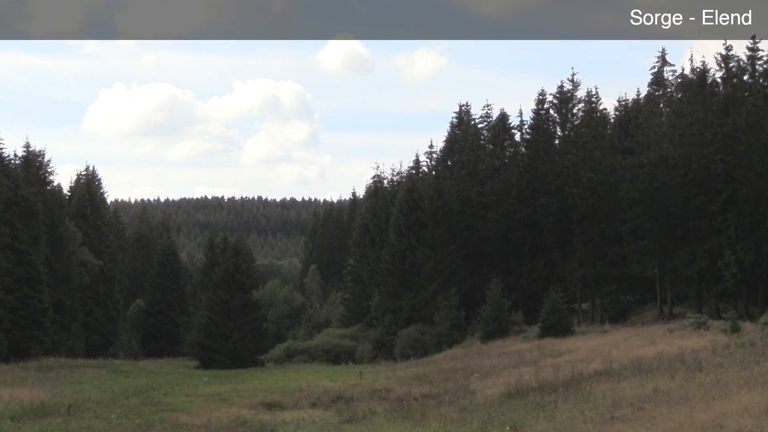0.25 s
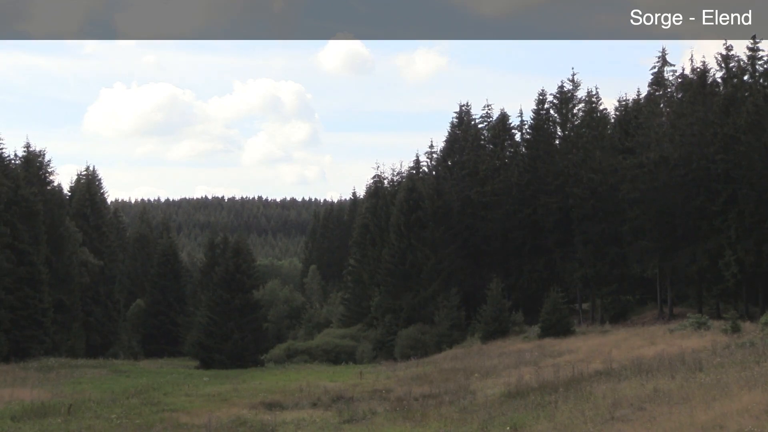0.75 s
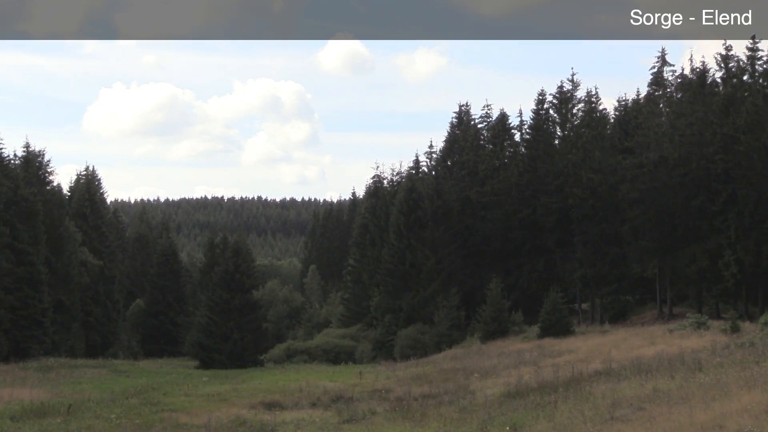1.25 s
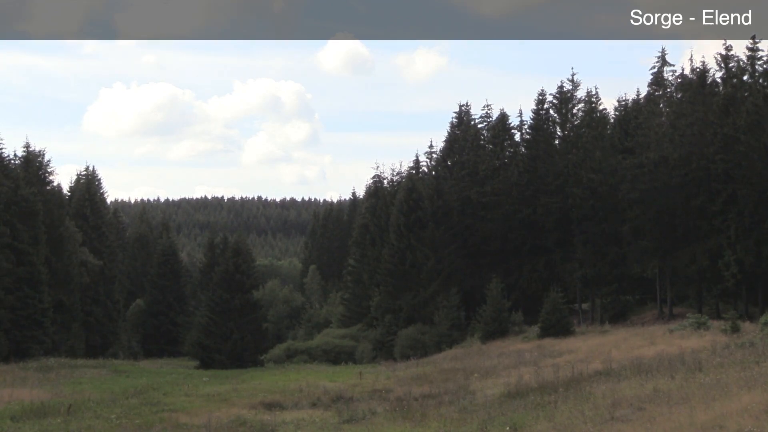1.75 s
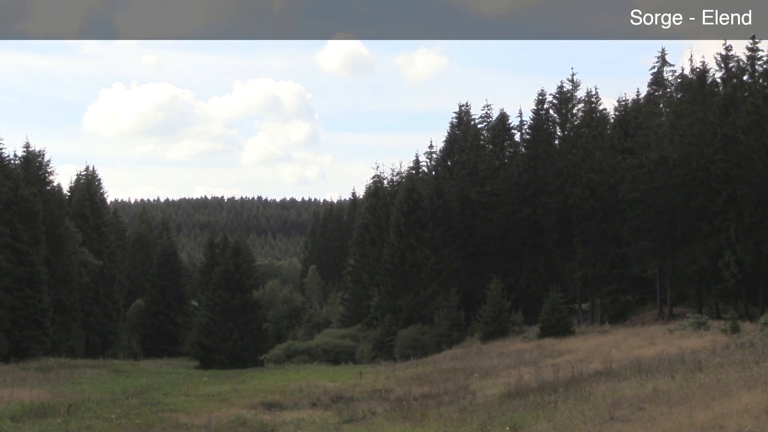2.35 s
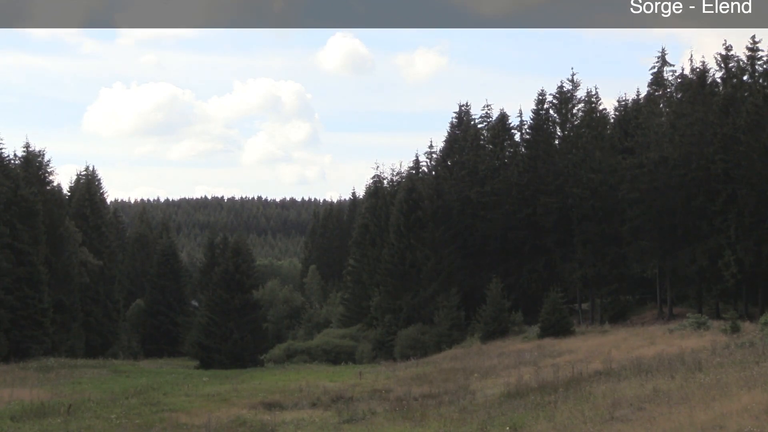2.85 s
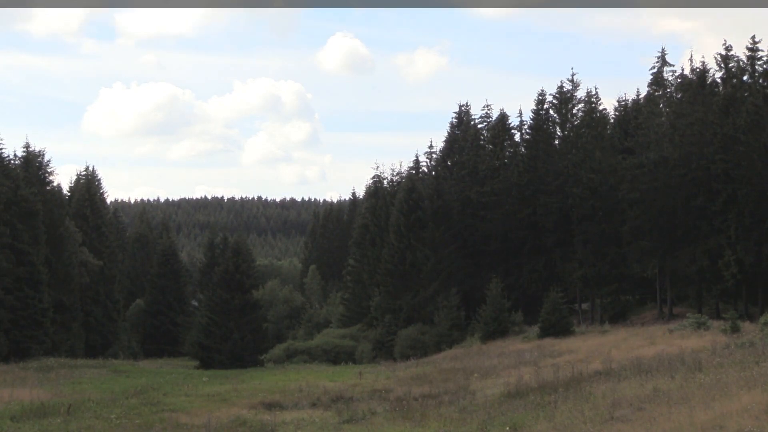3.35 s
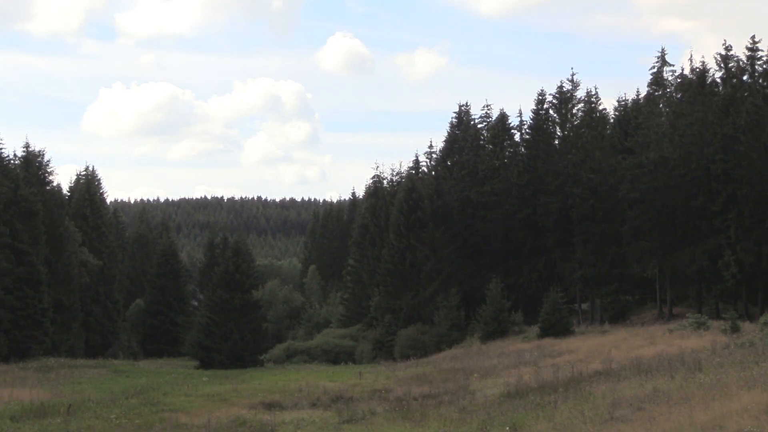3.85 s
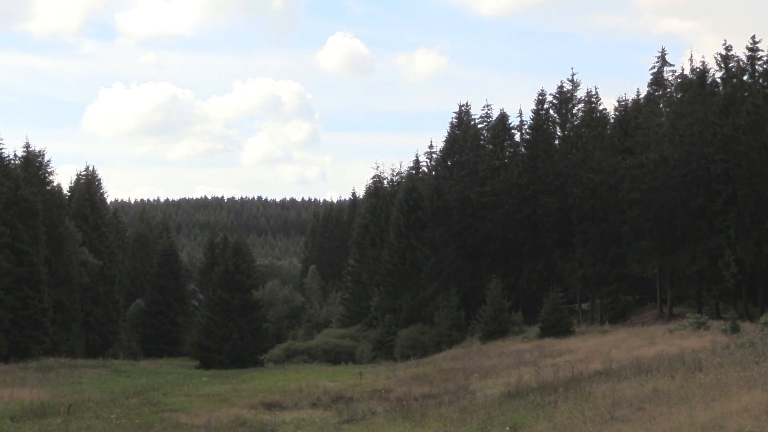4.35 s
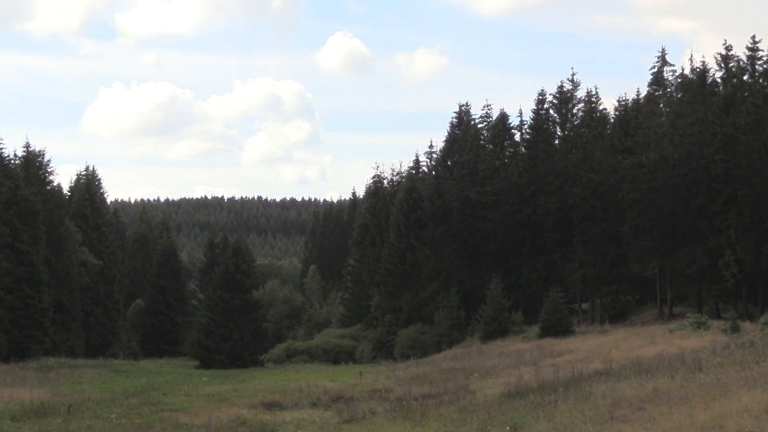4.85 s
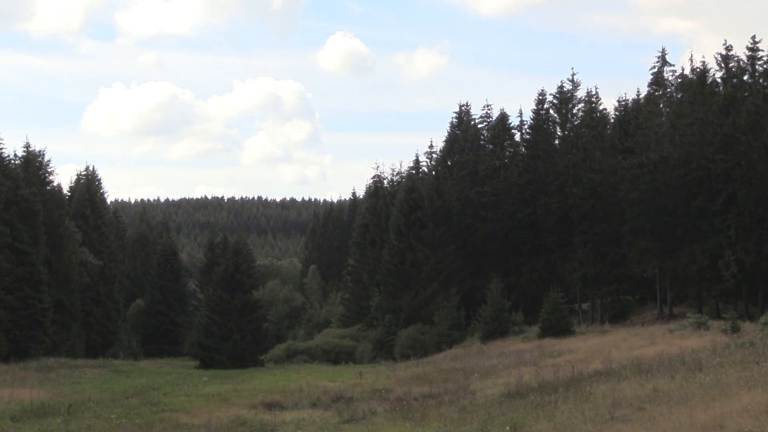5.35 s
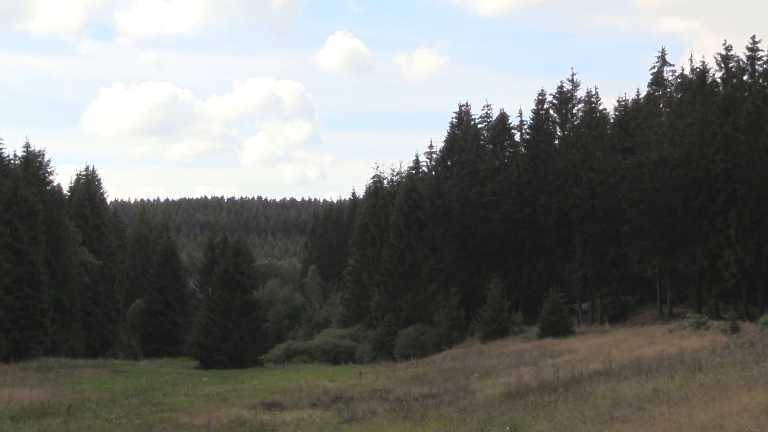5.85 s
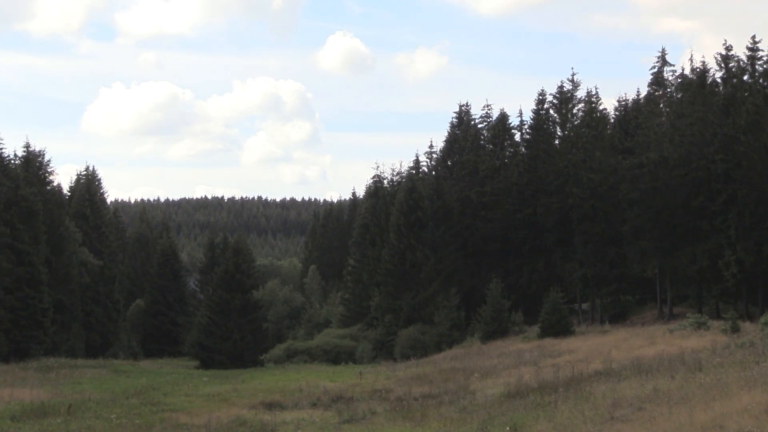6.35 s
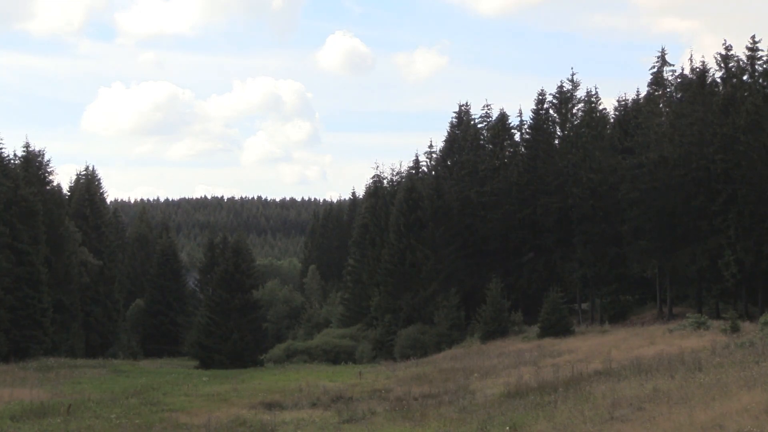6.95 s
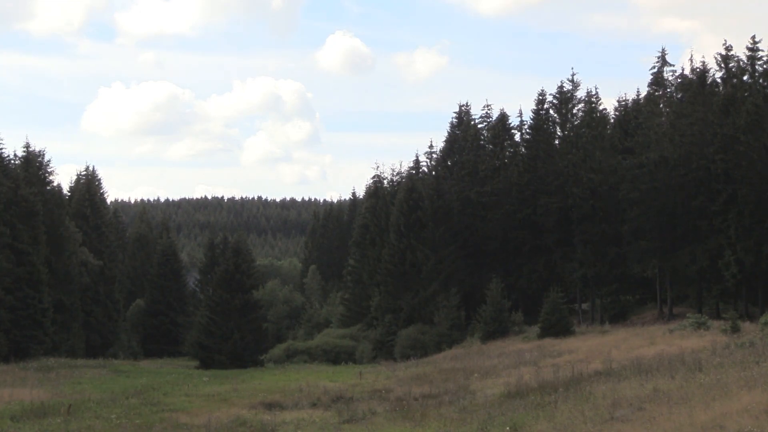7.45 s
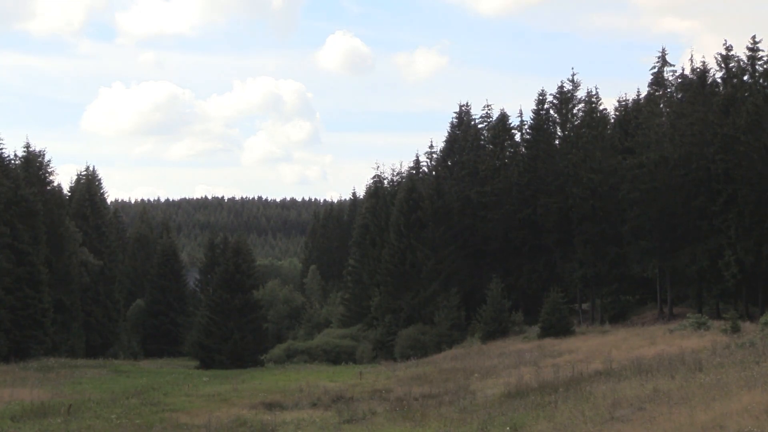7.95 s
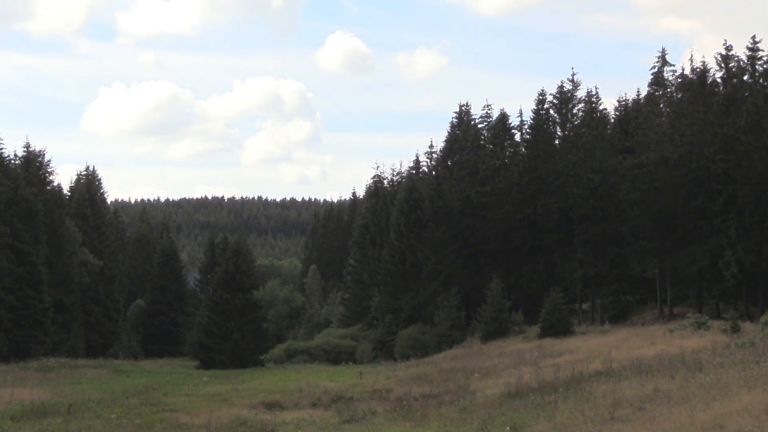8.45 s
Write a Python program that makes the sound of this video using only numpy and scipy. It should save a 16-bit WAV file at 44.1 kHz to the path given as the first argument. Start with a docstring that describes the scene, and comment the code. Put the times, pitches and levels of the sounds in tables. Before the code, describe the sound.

Far off in a wooded valley, a steam locomotive works uphill with quick, even chuffs over a soft rolling rush. Two faint grasshoppers scrape in the meadow while light wind rumbles on the microphone. The insects stop just before the whistle gives a loud, wavering blast and then a shorter one, both echoing off the slopes. The sound is on the right only, with faint hiss on the left.

```python
"""From a meadow in a wooded valley: far off, a steam locomotive works uphill, four exhaust beats to a
wheel turn, while light wind buffets the microphone. One grasshopper scrapes nearby from the start, a
farther one joins within a second. Both stop by 6 s, when the whistle gives a long blast, then a short one
near 8 s; the forest slopes throw both back. The microphone feeds the right input only; the left holds
preamplifier hiss and a trace of crosstalk."""
import sys
import numpy as np
from scipy import signal
from scipy.fft import rfft, irfft, next_fast_len
from scipy.io import wavfile
from scipy.ndimage import uniform_filter1d, map_coordinates

SR = 44100
rng = np.random.default_rng(int(sys.argv[2]) if len(sys.argv) > 2 else 0)


def put_to_file(sound):
    """Save the sound as 16-bit audio at rate SR, in the file named by the first command-line argument."""
    columns = np.atleast_2d(sound).T  # one column per channel
    safe = np.clip(columns, -1, 1)
    whole_steps = np.round(safe * 32767)
    wavfile.write(sys.argv[1], SR, whole_steps.astype(np.int16))


N = 384111
T = np.arange(N) / SR


# the chimney's own note: f/Hz, width/Hz, level/dB of the added resonance
CHIMNEY_NOTE = (242, 16, 0)
# the train comes nearer and clears the trees: t/s, treble gain/dB
APPROACH_TREBLE = [(0, -2), (3, -1), (5, 2.5), (8.71, 1.5)]

def train():
    """The distant engine: its chimney favours one low note; air and trees take less treble as it nears."""
    centre, width, db = CHIMNEY_NOTE
    sound = filtered(exhaust() + rolling(), lambda hz: 1 + amp(db) * resonance(hz, centre, width))
    bass = filtered(sound, lambda hz: 1 / (1 + 1j * hz / 600))
    return bass + amp(curves(APPROACH_TREBLE)[0]) * (sound - bass)


# the exhaust as it arrives over the meadow: f/Hz, relative level/dB
EXHAUST_SPECTRUM = [(41, -58), (70, -25), (171, -15), (235, -2), (322, -6), (451, 1), (731, -5),
                    (788, -4.5), (1060, -11), (1330, -27.5), (2000, -23.5), (2740, -39.5), (4540, -53),
                    (6000, -66.5), (7800, -78), (13200, -120)]

def exhaust():
    """Each beat is a turbulent puff up the chimney: a midrange bark first, then thump and rasp."""
    steam = unit(amp(1.74 * wobble(60)) * noise(EXHAUST_SPECTRUM))
    thump = filtered(steam, lambda hz: 1 / (1 + (hz / 340) ** 6))
    rasp = filtered(steam, lambda hz: 1 - 1 / (1 + (hz / 1350) ** 6))
    bark = steam - thump - rasp
    when, db = beats()
    return (bark * puffs(when, db, rise_s=0.014, t60_s=0.28, lead_s=0.039)
            + thump * puffs(when, db, rise_s=0.011, t60_s=0.25, lead_s=0.026)
            + amp(1) * rasp * puffs(when, db, rise_s=0.014, t60_s=0.24, lead_s=0.026))


# the driving wheels: t/s, turns so far
WHEEL_TURNS = [(0.016, 0), (0.878, 2), (2.157, 5), (3.428, 8), (4.712, 11), (5.999, 14), (7.29, 17),
               (9.011, 21)]
# how hard the engine barks: t/s, level/dB of the strongest beat
ENGINE_EFFORT = [(0, -41.5), (0.8, -39.5), (1.6, -36.5), (2.3, -39.5), (3.5, -38.5), (5, -40), (6, -39.5),
                 (7.5, -40.5), (8.71, -38)]
# the four unequal beats of a turn: level/dB against the strongest, lateness/turns
VALVE_BEATS = [(-0.5, 0.0071), (-3, 0.0035), (-4.5, -0.0048), (-3.5, -0.0037)]

def beats():
    """Times and levels of the exhaust beats, four to a wheel turn."""
    times, turns = np.transpose(WHEEL_TURNS)
    per_turn = len(VALVE_BEATS)
    beat = np.arange(int(np.interp(N / SR, times, turns) * per_turn) + 1)
    valve_db, late = np.transpose(VALVE_BEATS)[:, beat % per_turn]
    when = np.interp(beat / per_turn + late, turns, times)
    scatter_db = 0.67 * rng.standard_normal(len(beat))
    return when, np.interp(when, *np.transpose(ENGINE_EFFORT)) + valve_db + scatter_db


def puffs(when, db, rise_s, t60_s, lead_s):
    """The envelope of all puffs: each starts lead_s ahead of its beat, rises quickly and dies away."""
    spikes, t = np.zeros(N + SR), T[:SR // 4]
    spikes[np.round(when * SR).astype(int)] = amp(db)
    shape = (1 - np.exp(-t / rise_s)) ** 2 * amp(-60 * t / t60_s)
    return signal.fftconvolve(spikes, shape / shape.max())[round(lead_s * SR):][:N]


# brief dips of the tone on the straight path to the microphone: t/s, depth/dB
TONE_DIPS = [(6.16, -3), (6.222, -1), (6.329, -7.5), (6.486, -3), (6.534, -0.5), (6.595, -5), (7.941, -5.5),
             (7.993, -21.5)]

def whistle():
    """Straight sound and echoes: the train runs less towards the slopes, so they answer a little flat."""
    tone, octave, upper = pipe(pitch_ratio=0.99)
    dips_db = sum(depth * np.exp(-((T - when) / 0.007) ** 2) for when, depth in TONE_DIPS)
    straight = tone * amp(dips_db) + octave + amp(-4.5) * upper
    far_tone, far_octave, far_upper = pipe(pitch_ratio=0.97)
    overtone_echo = amp(-3) * valley(far_upper + amp(-5.5) * far_octave)
    tone_echo = amp(-5.5) * valley(far_tone)
    return straight + overtone_echo + tone_echo


# one list a blast, pitch following the pull on the valve: t/s, f/Hz before pitch_ratio, tone level/dB
WHISTLE_BLASTS = [
    [(6.03, 403.8, -62.5), (6.056, 399.1, -25), (6.108, 411.9, -16.5), (6.188, 436.9, -22.5),
     (6.272, 437.1, -16.5), (6.37, 424.1, -20), (6.448, 437.4, -18.5), (6.526, 455.8, -20),
     (6.562, 443.8, -15), (6.614, 411.6, -18), (6.64, 397.4, -44.5)],
    [(7.855, 400, -41), (7.885, 416.7, -21.5), (7.93, 424, -24), (7.963, 415, -21), (8.01, 407, -23.5),
     (8.045, 404, -33)],
]
# the short blast is pulled more sharply: overtone gain/dB for each blast
PULL_DB = [-2, 2]
# harmonics from the third up: relative level/dB, share blurred by the jet (0-1)
UPPER_HARMONICS = [(5, 0.5), (-7.5, .6), (-19.5, 0.8), (-16.5, .7), (-27.5, .9), (-32.5, .95), (-34, .95)]
# steam hissing over the bell's lip: f/Hz, relative level/dB
JET_SPECTRUM = [(200, -43), (450, 6), (1000, -15.5), (2000, -18), (3000, -21), (5000, -38), (7000, -52),
                (9000, -73.5)]
OCTAVE_DB, UPPER_DB, JET_DB = -23, -22.5, -29  # base levels against the smoothed tone
REST_HZ, UPPER_DB_PER_HZ, JET_DB_PER_HZ = 417, 0.0709, 0.1584  # pressure lifts them with the pitch

def pipe(pitch_ratio):
    """A steam jet sounds the bell: a nearly pure tone, its octave, and blurred harmonics with hiss."""
    hz, db = curves(sum(WHISTLE_BLASTS, []))
    spans = [(rows[0][0], rows[-1][0]) for rows in WHISTLE_BLASTS]
    valve = sum(gate(start, end, 0.022) for start, end in spans)
    pressure = sum(gate(start, end + 1, 0.12) for start, end in spans)
    phase = 2 * np.pi * np.cumsum(pitch_ratio * hz) / SR
    tone = np.sqrt(2) * np.sin(phase) * valve * amp(db)
    octave = amp(OCTAVE_DB + 3 * wobble(25)) * np.sqrt(2) * np.sin(2 * phase)
    upper = amp(JET_DB + JET_DB_PER_HZ * (hz - REST_HZ)) * pressure ** 0.7 * noise(JET_SPECTRUM)
    for k, (level_db, blur) in enumerate(UPPER_HARMONICS, start=3):
        steady = 1 - blur + blur * wobble(14 * k)
        waver = blur * wobble(14 * k)
        gain = amp(UPPER_DB + level_db + UPPER_DB_PER_HZ * (hz - REST_HZ))
        onset = pressure ** (0.19 * (k - 2))  # high harmonics wait for the pressure
        upper += gain * onset * (steady * np.cos(k * phase) + waver * np.sin(k * phase))
    blast = np.searchsorted([end for _, end in spans[:-1]], T)
    envelope = valve * amp(uniform_filter1d(db, size=3000) + np.array(PULL_DB)[blast])
    return tone, octave * envelope, upper * envelope


# what the slopes send back to the meadow: delay/s, level/dB
SLOPE_ECHOES = [(0, -8), (0.1, -4.5), (0.18, -11), (0.3, -12), (0.4, -12.5), (0.55, -15.5), (0.799, -31),
                (1.15, -27), (1.4, -21.5), (1.55, -26.5), (2, -30.5), (2.7, -49)]
# its colour: f/Hz, gain/dB
ECHO_COLOUR = [(300, -2), (450, -5), (850, 12.5), (1300, 4.5), (1800, 16), (3000, 11), (7000, 21)]
# how the colour changes with delay: f/Hz, gain rate/(dB/s)
ECHO_FADE = [(450, 5), (850, -3.5), (1300, -1.5), (2500, -11), (5000, -39.5)]

def valley(x):
    """Countless trunks and slopes scatter the sound; treble fades with the length of the detour."""
    hz, delay, scatter = signal.stft(rng.standard_normal(3 * SR), SR, nperseg=256)
    echo_db = np.interp(delay, *np.transpose(SLOPE_ECHOES))
    colour_db = along(ECHO_COLOUR, hz)[:, None] + along(ECHO_FADE, hz)[:, None] * delay
    tail = signal.istft(scatter * amp(echo_db + colour_db), SR, nperseg=256)[1]
    return signal.fftconvolve(x, tail / np.sqrt(SR / 10))[:N]


# the rush between the beats: t/s, relative level/dB
ROLLING_LEVEL = [(0.0, -47.5), (1.8, -48.5), (2.2, -48), (5.9, -49.5), (6.4, -46.5), (8.71, -47)]
# its colour from across the valley: f/Hz, relative level/dB
ROLLING_SPECTRUM = [(41, -51), (70, -10), (107, -16), (156, -10), (235, 2), (305, -2), (533, -1),
                    (1000, -11), (1380, -22), (2040, -20.5), (2690, -29), (6000, -50), (7800, -80.5),
                    (13200, -120)]

def rolling():
    """Rolling noise and exhaust, smeared by the forest into a steady rush."""
    return amp(curves(ROLLING_LEVEL)[0] - 2 + 0.72 * wobble(2.3)) * noise(ROLLING_SPECTRUM)


# the legs of the near and the far grasshopper: t/s, strokes so far
NEAR_STROKES = [(0.0, 0.45), (1.2, 27.11), (1.5, 33.72), (2.4, 53.3), (3.6, 79.57), (5.4, 118.6),
                (5.7, 124.7)]
FAR_STROKES = [(0.6, 13.4), (1.8, 41.12), (3.9, 89.62), (4.8, 110.35), (5.4, 123.91), (6.0, 137.16)]
# their loudness at the microphone: t/s, level/dB
NEAR_LOUDNESS = [(0, -76), (0.7, -73.5), (5.7, -73.5)]
FAR_LOUDNESS = [(0.6, -91), (1.8, -82), (3.3, -79.5), (6, -79.5)]
# their wing resonances: f/Hz, width/Hz, relative level/dB
NEAR_WING_MODES = [(7570, 1120, 4.5), (8170, 900, 6.5), (9670, 300, -2.5)]
FAR_WING_MODES = [(7900, 620, -0.5), (9530, 1400, 2.5)]

def grasshopper(strokes, loudness, wing, pegs_hz, duty, grain):
    """Each leg stroke drags a row of pegs over the wing, swelling and easing off."""
    times, count = np.transpose(strokes)
    last_pace = (count[-1] - count[-2]) / (times[-1] - times[-2])
    done = np.interp(T, times, count) + last_pace * np.maximum(T - times[-1], 0)
    travel = (done + 0.49 * duty) % 1 / duty  # 0-1 along the row; above 1 the leg rests
    swell = np.clip(travel / 0.4, 0, 1) * np.clip((1 - travel) / 0.44, 0, 1)
    peg_phase = np.cumsum(pegs_hz * (1 + 0.091 * wobble(80))) / SR % 1
    scrape = rng.standard_normal(N) * (1 - grain + grain * np.exp(-peg_phase / 0.2))
    drive = swell * scrape * amp(1.1 * wobble(21.7))
    buzz = filtered(drive, lambda hz: sum(amp(db) * resonance(hz, f, width) ** 2 for f, width, db in wing))
    return unit(buzz) * amp(curves(loudness)[0])


# wind at the microphone: t/s, level/dB
WIND_LEVEL = [(0, -55), (2.8, -56.5), (3.2, -59), (5, -51), (6.4, -54), (7.3, -50), (8.71, -53)]
# its rumble: f/Hz, relative level/dB
BUFFET_SPECTRUM = [(8.8, -34), (15, 2), (43, 3), (57, -6.5), (90, -24.5), (120, -47.5), (200, -120)]

def wind():
    """Slow pressure lumps on the microphone, in gusts."""
    gusts = amp(1.9 * wobble(5.5) + 1.2 * wobble(2.5))
    return amp(curves(WIND_LEVEL)[0]) * unit(gusts * noise(BUFFET_SPECTRUM))


# the noise of each input: f/Hz, relative level/dB
HISS_SPECTRUM = [(15, 18.5), (40, 10.5), (100, -4.5), (1000, -1), (6000, -3), (12000, -5), (15700, -4)]

def preamp_hiss():
    """Each of the two preamplifiers hisses on its own."""
    return amp(-73) * np.array([noise(HISS_SPECTRUM), noise(HISS_SPECTRUM)])


def amp(db):
    """dB to gain."""
    return 10 ** (np.asarray(db) / 20)


def unit(x):
    """Scaled to rms 1."""
    return x / np.sqrt(np.mean(x ** 2) + 1e-20)


def along(points, hz):
    """Rows of f/Hz, value, interpolated on a log axis."""
    f, values = np.transpose(points)
    return np.interp(np.log(hz + 1), np.log(f + 1), values)


def curves(rows):
    """One value per sample for each column after the time."""
    times, *columns = np.transpose(rows)
    return [np.interp(T, times, column) for column in columns]


def wobble(rate):
    """A smooth random curve, rate knots a second."""
    knots, coarse = rng.standard_normal(int(N * rate / SR) + 4), T[::16]
    return np.interp(T, coarse, map_coordinates(knots, [coarse * rate]))


def resonance(hz, centre, width):
    """Complex response of one damped mode, 1 at its centre."""
    return 1j * hz * width / (centre ** 2 - hz ** 2 + 1j * hz * width)


def filtered(x, response):
    """x through a complex response of frequency."""
    size = next_fast_len(N + SR // 2)
    return irfft(rfft(x, size) * response(np.fft.rfftfreq(size, 1 / SR)), size)[..., :N]


def noise(spectrum):
    """Coloured noise of rms 1."""
    return unit(filtered(rng.standard_normal(N), lambda hz: amp(along(spectrum, hz))))


def gate(start, end, fade):
    """Opens from start and is shut by end, each over fade seconds."""
    return np.clip((T - start) / fade, 0, 1) * np.clip((end - T) / fade, 0, 1)


def scene():
    """One microphone in the meadow: the train far off, grasshoppers in the grass, wind on the capsule."""
    near = grasshopper(NEAR_STROKES, NEAR_LOUDNESS, NEAR_WING_MODES, pegs_hz=284, duty=0.77, grain=0.55)
    far = grasshopper(FAR_STROKES, FAR_LOUDNESS, FAR_WING_MODES, pegs_hz=320, duty=0.84, grain=0.68)
    insects = near * gate(-1, 5.735, 0.01) + far * gate(0.65, 5.965, 0.012)
    sound = train() + whistle() + insects + wind()
    return np.array([sound, sound])


def record(dry):
    """Microphone on the right input, only crosstalk on the left; both hiss, and the band is limited."""
    crosstalk_db, gain_db, top_hz = -58, 6.02, 15740
    inputs = dry * amp([[crosstalk_db], [gain_db]]) + preamp_hiss()
    return filtered(inputs, lambda hz: hz < top_hz)


dry = scene()
out = record(dry)
put_to_file(out)
```